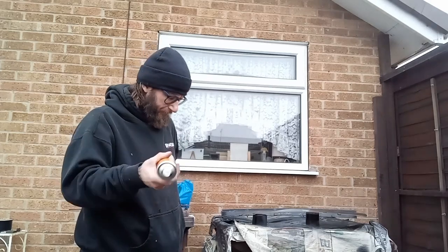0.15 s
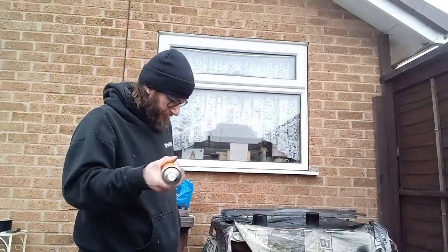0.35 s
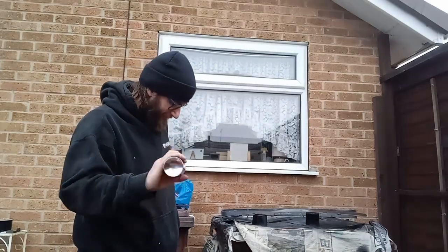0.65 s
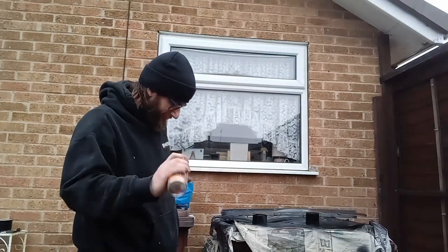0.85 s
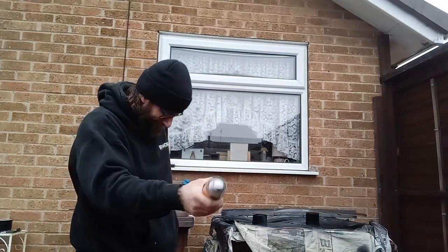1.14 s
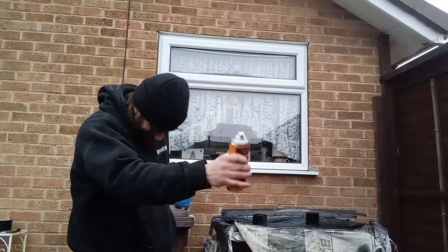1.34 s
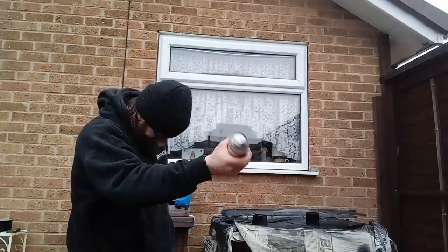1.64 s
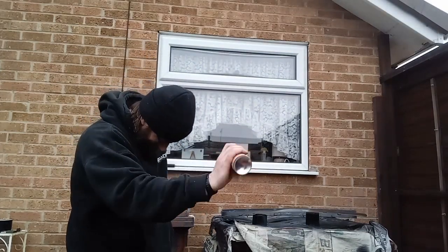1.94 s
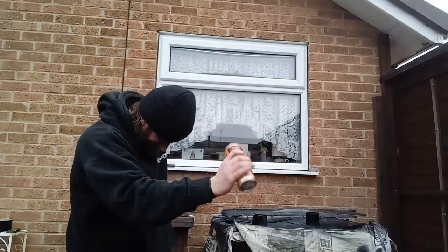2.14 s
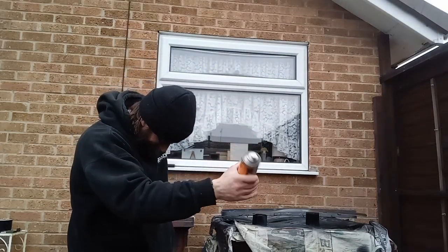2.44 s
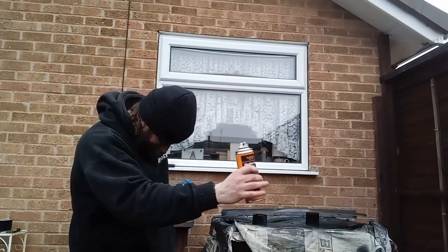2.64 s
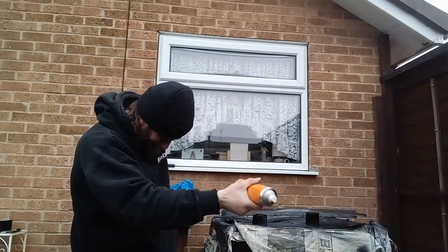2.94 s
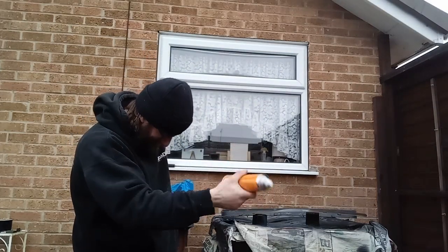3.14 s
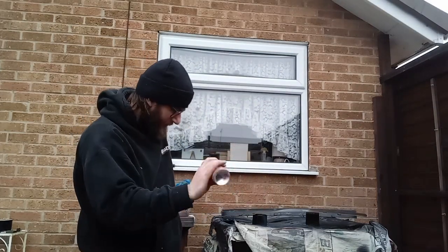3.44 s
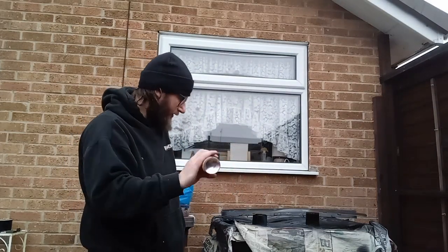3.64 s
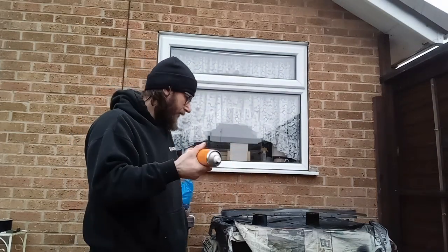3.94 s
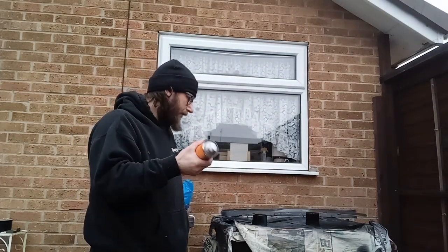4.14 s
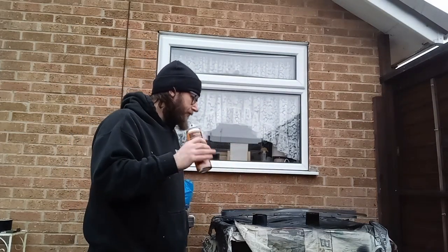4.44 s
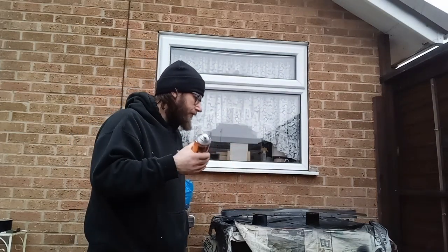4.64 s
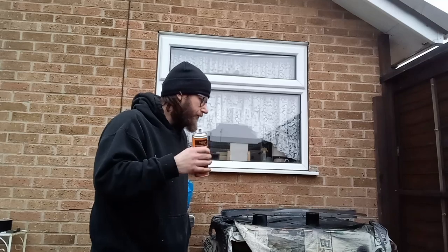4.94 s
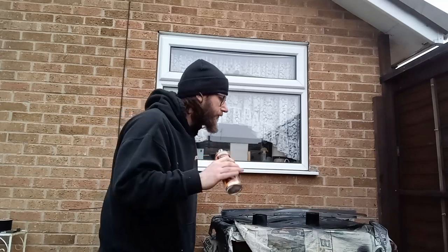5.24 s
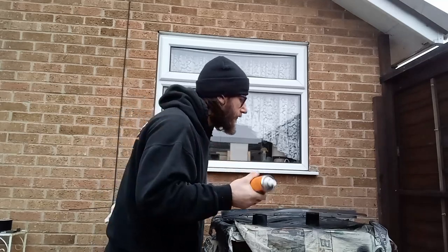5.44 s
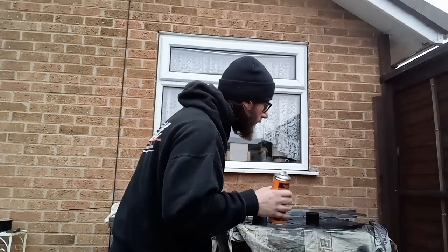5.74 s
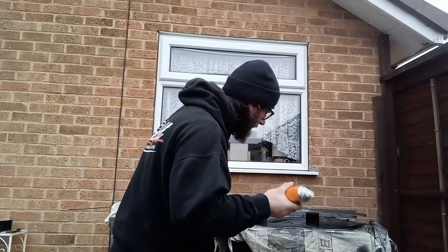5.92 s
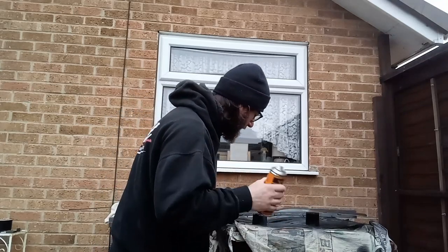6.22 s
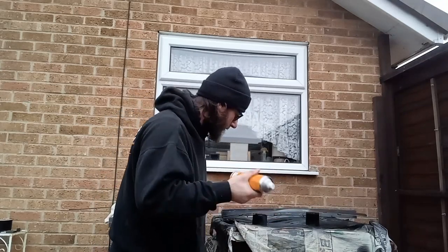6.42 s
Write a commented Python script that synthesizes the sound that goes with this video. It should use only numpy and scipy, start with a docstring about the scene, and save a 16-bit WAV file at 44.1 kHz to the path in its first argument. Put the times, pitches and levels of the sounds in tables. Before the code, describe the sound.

A paint can is shaken close to the microphone in a brick-walled yard. The ball starts with dull, medium knocks, bursts into loud, bright metallic rattling, eases to softer hollow clicks, then turns sharp and tinny again. Paint sloshes faintly; short echoes bounce off the walls. A distant engine wavers low underneath and a car approaches at the end.

```python
"""Shaking a spray paint can

A spray can is shaken by hand in a brick-walled yard. Its mixing ball knocks dully on the side wall, cracks
brightly on the steel ends and skitters in between: short clicks and noise, coloured by the can's resonances.
Paint sloshes as swelling filtered noise, and the yard answers with scattered echoes and a fading tail.
Underneath are a distant engine (wavering sines), low rumble, open-air noise and a car coming nearer.
"""
import sys
import numpy as np
from scipy import signal
from scipy.fft import rfft, irfft
from scipy.io import wavfile
from scipy.ndimage import uniform_filter1d

SR = 44100
rng = np.random.default_rng(int(sys.argv[2]) if len(sys.argv) > 2 else 0)


def wrap_up_sound(samples):
    """Save the sound to the file named by the first command line argument, as 16-bit audio."""
    columns = np.atleast_2d(samples).T
    # keep every value between -1 and 1, then stretch to whole-number steps
    tamed = np.clip(columns, -1, 1)
    steps = np.round(tamed * 32767).astype(np.int16)
    wavfile.write(sys.argv[1], SR, steps)


N = 290045
BLOW_SIZE = 16384  # samples of sound made for one blow

# Blows of the ball: t/s, relative energy level/dB, contact (0 side wall .. 1 steel end),
# squareness (0 glancing .. 1 head-on)
BALL_BLOWS = [(0.002, -2.6, 0.29, 0.25), (0.0373, -3.5, 0.0, 0.28), (0.0966, 4, 0.37, 0.91),
              (0.1416, -3, 0.18, 0.34), (0.1885, 2.9, 0.18, 0.68), (0.2428, -2, 0.065, 0.34),
              (0.2844, 5.5, 0.32, 0.56), (0.3587, -9.5, 0.38, 0.75), (0.394, -2.5, 0.32, 0.53),
              (0.411, 0, 0.26, 0.29), (0.4819, 2.5, 0.29, 0.3), (0.5143, -7, 0.34, 0.64),
              (0.5985, -2, 0.32, 0.57), (0.6072, 7, 0.61, 0.47), (0.6121, 7.8, 0.83, 0.82),
              (0.6342, -1, 0.62, 0.79), (0.6916, -11, 0.0, 1), (0.7496, -10, 0.31, 0.13),
              (0.8035, 8, 0.72, 0.27), (0.8667, 11.5, 0.67, 0.69), (0.9044, 3, 0.68, 0.33),
              (1.0008, 8, 0.72, 0.37), (1.0115, 3, 0.56, 0.33), (1.0604, 0.5, 0.62, 0.55),
              (1.107, 12, 0.73, 0.65), (1.166, 5, 0.72, 0.3), (1.1756, 10, 0.58, 0.46),
              (1.2356, 14, 0.75, 0.66), (1.2618, 7, 0.73, 0.75), (1.3693, -8, 0.32, 0.45),
              (1.3778, 9.5, 0.71, 0.7), (1.4365, 7.5, 0.73, 0.79), (1.4642, 0.3, 0.58, 0.37),
              (1.5352, 7, 0.8, 0.33), (1.5483, 6, 0.54, 0.58), (1.6637, 4, 0.76, 0.54),
              (1.692, 5, 0.4, 0.68), (1.707, 6, 0.68, 0.34), (1.7894, 7.5, 0.71, 0.58),
              (1.875, 9, 0.66, 0.21), (1.9669, 1, 0.61, 0.11), (2.0101, 1.5, 0.56, 0.31),
              (2.075, 9.5, 0.65, 0.24), (2.1411, 1, 0.65, 0.28), (2.1603, 0.5, 0.64, 0.65),
              (2.241, 4.5, 0.7, 0.48), (2.2578, 3, 0.51, 0.081), (2.3505, -4, 0.064, 0.61),
              (2.3838, 8, 0.63, 0.44), (2.4436, 7, 0.92, 0.36), (2.4555, 9.5, 0.65, 0.38),
              (2.6813, -4, 0, 0.46), (2.6917, -4.5, 0.4, 0.28), (2.735, -3.5, 0.38, 0.82),
              (2.7663, -11.5, 0.27, 0.9), (2.875, -4.5, 0.0, 0.56), (2.881, -1.5, 0.37, 0.38),
              (2.905, -2.5, 0.47, 0.98), (2.9581, -0.5, 0.23, 0.15), (3.1371, -11.5, 0.31, 0.18),
              (3.2492, -0.5, 0.27, 0.27), (3.331, -8, 0.32, 0.22), (3.3991, -0.5, 0.31, 0.25),
              (3.4271, 0, 0.044, 0.49), (3.4876, 2.3, 0.24, 0.81), (3.5408, -4, 0.39, 0.1),
              (3.587, -0.3, 0.19, 0.25), (3.665, 1.9, 0.33, 0.23), (3.8052, -7.5, 0.0065, 0.22),
              (3.8368, -9, 0.34, 0.18), (3.8762, -6, 0, 0.52), (3.901, 2, 0.42, 0.43),
              (4.035, -1.7, 0.12, 0.19), (4.0819, -1, 0.29, 0.37), (4.1118, -4, 0.47, 0.28),
              (4.205, -14.5, 0.4, 0.36), (4.2673, -4, 0.0, 0.21), (4.2977, 1, 0.27, 0.67),
              (4.322, -6, 0.59, 0.69), (4.3725, -9.5, 0.6, 0.42), (4.4161, -7.5, 0.44, 0.32),
              (4.4349, -0.7, 0.18, 0.27), (4.5461, 0, 0.39, 0.38), (4.6688, -3.3, 0.3, 0.38),
              (4.6915, -3, 0, 0.38), (4.7416, -0.9, 0.13, 0.39), (4.7682, -3.5, 0.47, 0.2),
              (4.899, -12, 0.2, 0.2), (4.959, -9, 0.38, 0.51), (5.028, -3.5, 0.7, 0.1),
              (5.042, 0.2, 0.79, 0.51), (5.1494, 6, 0.82, 0.37), (5.1997, 3.5, 0.69, 0.46),
              (5.269, -1.5, 1, 0.36), (5.275, 1.5, 0.92, 0.89), (5.339, 4, 0.9, 0.53),
              (5.4016, 0.4, 0.9, 0.51), (5.4601, -5.5, 0.52, 0.1), (5.5349, 3.5, 0.9, 0.85),
              (5.612, -13, 0.29, 0.18), (5.6907, 1, 0.8, 0.26), (5.7207, 1.7, 0.41, 0.31),
              (5.789, 7.5, 0.69, 0.67), (5.8173, 1.5, 0.88, 0.69), (5.846, -1.2, 0.85, 0.31),
              (5.9652, 3, 0.93, 0.43), (5.9801, 2, 0.74, 0.39), (6.0684, 3.6, 0.86, 0.15),
              (6.242, 0.7, 0.75, 0.37), (6.3067, 1, 0.9, 0.31), (6.322, 1.3, 0.78, 0.3),
              (6.4615, 8.5, 0.87, 0.62), (6.487, -2.5, 0.63, 0.74), (6.5574, 7.5, 1, 0.24)]


def undb(db):
    """Turn decibels into a gain."""
    return 10 ** (np.asarray(db) / 20)


def curve(table, column=1):
    """Read one column of a time table at every sample, with straight lines between the rows."""
    rows = np.array(table)
    return np.interp(np.arange(N) / SR, rows[:, 0], rows[:, column])


def spectrum(points, hz):
    """Read the decibels of a (f/Hz, level/dB) table at the given frequencies."""
    f, db = np.transpose(points)
    return np.interp(np.log(hz + 1), np.log(f), db)


def unit(x):
    """Scale each channel to an energy of one."""
    return x / np.sqrt(np.sum(x ** 2, axis=-1, keepdims=True))


def noise(points):
    """Make noise of rms 1, coloured by a spectrum table."""
    gain = undb(spectrum(points, np.fft.rfftfreq(N, 1 / SR)))
    coloured = irfft(rfft(rng.standard_normal(N)) * gain, N)
    return unit(coloured) * np.sqrt(N)


def wide(points, side_db):
    """Coloured stereo noise: a shared part plus a part of opposite sign left and right."""
    middle = noise(points)
    side = noise(points) * np.array([[1], [-1]])
    return middle + undb(side_db) * side


def walk(rate):
    """Smooth random wandering with a spread of one; rate is new random values per second."""
    step = int(SR / rate)
    steps = np.repeat(rng.standard_normal(N // step + 1), step)
    smooth = uniform_filter1d(steps, step)[:N]
    return smooth / smooth.std()


def causal(db):
    """Make a frequency response with this gain whose energy comes as early as it can."""
    cepstrum = irfft(np.log(undb(db)))
    half = len(cepstrum) // 2
    cepstrum[1:half] *= 2
    cepstrum[half + 1:] = 0
    return np.exp(rfft(cepstrum))


def mode(t, hz, t60):
    """Ringing modes: sines that fall by 60 dB in t60 seconds, one row for each frequency."""
    phase = (2 * np.pi * np.reshape(hz, (-1, 1)) * t).astype(np.float32)
    return np.sin(phase) * np.exp(-np.log(1000) * t / t60)


def add(out, s, sound):
    """Mix a sound in at time s, in seconds."""
    start = int(np.clip(s * SR, 0, N - 1))
    out[:, start:start + sound.shape[1]] += sound[:, :N - start]


def slosh(surge_db=3, surge_rate=14, db=-3, rise_s=0.029, fall_s=0.073):
    """Paint and propellant surge inside the can; each swirl rises, holds and settles."""
    # swirls of the paint: start t/s, length/s, level/dB before the overall gain and surging
    swirls = [(0, 1.25, -53.5), (3.4, 1.5, -62), (5.15, 0.055, -49.5)]
    # sound of the hollow can: f/Hz, level/dB
    hollow = [(120, -28), (230, -8), (330, -2.0), (460, 7.0), (650, -5), (2000, -11), (8000, -37)]
    flow = np.zeros(N)
    for s, length, swirl_db in swirls:
        envelope = curve([(s - rise_s, 0), (s, 1), (s + length, 1), (s + length + fall_s, 0)])
        flow += undb(swirl_db) * envelope
    surge = undb(surge_db * walk(surge_rate) + db)
    return wide(hollow, side_db=-17.0) * flow * surge


def street(rumble_db=-30, rumble_follows=.43, air_db=-58, wander=0.0298, waver_db=3.5,
           overtone_db=-14, surge_db=5.5):
    """One wavering engine note, a rumble that swells with it and the soft noise of open air."""
    # distant engine speeding up and easing off: t/s, central firing rate f/Hz, central level/dB
    engine_course = [(0, 68.9, -51), (1.5, 45, -55), (2.2, 55, -44), (2.9, 58.8, -43.5), (3.1, 65.9, -61),
                     (3.68, 71.9, -44), (4.0, 79.14, -50.5), (4.65, 65.1, -41), (4.9, 52.1, -54),
                     (5.25, 46.8, -39), (5.6, 46, -54.5)]
    # colour of the low rumble: f/Hz, relative level/dB
    rumble_colour = [(22, -51), (32, -24), (48, -0.5), (65, 0.5), (95, -14.5), (125, -9), (190, -20),
                     (2000, -81)]
    # colour of the open air: f/Hz, relative level/dB
    air_colour = [(60, 4), (170, -2), (260, 5.5), (600, 1.5), (1200, 3.5), (3000, -27), (8000, -13.5),
                  (16000, -24.5)]

    load_db = curve(engine_course, 2)
    firing_hz = curve(engine_course) * (1 + wander * walk(14))
    phase = 2 * np.pi * np.cumsum(firing_hz) / SR
    note = np.sin(phase) + undb(overtone_db) * np.sin(2 * phase)
    engine = note * undb(load_db + waver_db * walk(8))

    # tanh keeps the random swells within surge_db
    swell_db = rumble_db + rumble_follows * load_db + surge_db * np.tanh(walk(9))
    rumble = wide(rumble_colour, side_db=-18.0) * undb(swell_db)
    air = wide(air_colour, side_db=-4.0) * undb(air_db + walk(3.05))
    return engine + rumble + air


def can_colour(hz, contact, bright, low_hz=420):
    """Response of the can between side wall and steel end; so small a body radiates little bass."""
    # can struck on its side wall: f/Hz, level/dB
    wall_colour = [(400.0, -17), (700.0, -15.5), (1000.0, -5), (1400.0, -0.5), (2000.0, 1.5), (2650.0, -5),
                   (3300.0, -13.0), (4100.0, -7), (5400.0, -17.5), (7200.0, -29.5), (8600.0, -24.5),
                   (10500.0, -15.5), (12500.0, -28), (15000.0, -28)]
    # can struck on a domed end: f/Hz, level/dB
    dome_colour = [(400.0, -32), (700.0, -22), (1000.0, -14), (1400.0, -13.5), (2000.0, -18), (2650.0, -6),
                   (3300.0, -6), (4100.0, -3), (5400.0, 2), (7200.0, 3), (8600.0, -6), (10500.0, -10.5),
                   (12500.0, -10.5), (15000.0, -17)]
    db = (1 - contact) * spectrum(wall_colour, hz) + contact * spectrum(dome_colour, hz)
    # bright is a tilt in dB per octave around 4 kHz
    octaves = np.log2(np.maximum(hz, 500) / 4000)
    bass_loss_db = 10 * np.log10(1 + (low_hz / (hz + 1)) ** 4)
    return causal(db + bright * octaves - bass_loss_db)


def spot(hz, ripple_db=2, spacing_hz=450):
    """Each spot on the can favours its own resonances: a random ripple over the spectrum."""
    knots_hz = np.arange(200) * spacing_hz
    ripple = np.interp(hz, knots_hz, rng.standard_normal(len(knots_hz)))
    return causal(ripple_db * ripple)


def blow_shape(db, square, bright_db=0.4, bright_per_db=0.15, square_bright_db=1):
    """A square hit mostly cracks, a glancing one mostly rings; hard, square hits are brighter."""
    square = np.clip(square, .03, .97)
    bright = bright_db + bright_per_db * db + square_bright_db * (square - .5)
    crack_gain = undb(db) * np.sqrt(square)
    ring_gain = undb(db) * np.sqrt(1 - square)
    return bright, crack_gain, ring_gain


def crack(t, buzz_db=1, apart_db=-6):
    """The contact: a sharp tick and a brief buzz of sheet steel, slightly different left and right."""
    buzz_s = .0008
    chance = rng.standard_normal((3, len(t)))
    buzz = unit((chance[0] + undb(apart_db) * chance[1:]) * np.exp(-t / buzz_s))
    tick = t == 0
    return tick + undb(buzz_db) * buzz


def scatter(t, rise_s=0.0027, fall_s=0.024, slap_db=-13, shared=0.35, lump_db=3):
    """Lumpy early echoes from window, bricks and fence, with two slaps from the wall and the ground."""
    chance = rng.standard_normal((3, len(t)))
    knots_s = np.arange(0, t[-1], .0017)
    lumps = undb(lump_db * np.interp(t, knots_s, rng.standard_normal(len(knots_s))))
    envelope = (1 - np.exp(-t / rise_s)) * np.exp(-t / fall_s)
    spray = unit((shared * chance[0] + chance[1:]) * lumps * envelope)
    # the two slap delays shift a little from blow to blow
    for path_s in np.array([.0072, .0125]) + .001 * rng.standard_normal(2):
        spray[:, int(abs(path_s) * SR)] += undb(slap_db)
    return spray


def shell(t, t60=0.15):
    """The shell rings on; shifting paint detunes its modes, the low ones most, with new weights each blow."""
    # ringing modes of the steel shell before detuning: f/Hz
    shell_modes = [1332, 1680, 2047, 2463, 2790, 3454, 4410, 4870, 5510, 7100, 7430, 8370, 8900]
    hz = np.array(shell_modes)
    detune = .016 * (1 + (2200 / hz) ** 3)
    detuned_hz = hz * (1 + detune * rng.standard_normal(len(hz)))
    weights = rng.standard_normal((2, len(hz)))
    return weights @ mode(t, detuned_hz, t60)


def blows(wall_ring_db=-6, dome_ring_db=-8, echo_db=-1.0, direct_db=0, wall_tilt_db=0.94,
          dome_tilt_db=-1.0, crack_blend=0.14, crack_bright_db=0.22, crack_low_hz=800):
    """Every blow of the ball: the crack, its near echoes and the ring of the shell."""
    # where the hand holds the can: t/s, lag of the left microphone behind the right/ms
    hand_place = [(.6, -0.056), (1.45, 0.062), (2.9, 0.082), (4.9, -0.028), (5.75, 0.13), (6.5, 0.095)]
    out = np.zeros((2, N))
    t, hz = np.arange(BLOW_SIZE) / SR, np.fft.rfftfreq(BLOW_SIZE, 1 / SR)
    for s, db, contact, square in BALL_BLOWS:
        contact = np.clip(contact, 0, 1)
        bright, crack_gain, ring_gain = blow_shape(db, square)
        colour = can_colour(hz, contact, bright) * spot(hz)

        # delay each side by 0.2 ms plus or minus half the lag
        lag_s = np.interp(s, *np.transpose(hand_place)) / 1000
        delay_s = .0002 + np.array([[lag_s], [-lag_s]]) / 2
        ports = np.exp(-2j * np.pi * hz * delay_s)

        # the first crack shakes wall and ends alike, so its contact moves towards halfway
        blend = contact + crack_blend * (.5 - contact)
        crack_colour = can_colour(hz, blend, bright + crack_bright_db, crack_low_hz) * spot(hz)
        direct = unit(irfft(rfft(crack(t)) * crack_colour * ports))

        # tilt echoes and ring a little: brighter for the side wall, duller for the ends
        tilt_db = wall_tilt_db + contact * (dome_tilt_db - wall_tilt_db)
        lasting = colour * undb(tilt_db * np.log2(1 + hz / 1000))
        echoes = unit(irfft(rfft(scatter(t)) * lasting))
        ring_db = wall_ring_db + contact * (dome_ring_db - wall_ring_db)
        ring = undb(ring_db) * unit(irfft(rfft(shell(t)) * lasting))

        after = undb(echo_db) * echoes + ring
        add(out, s, crack_gain * undb(direct_db) * direct + ring_gain * after)
    return out


def yard(x, db, low_t60=0.3, high_t60=0.074, treble_db=-7, rise_s=0.0071):
    """The late, faint reverberation between the houses; its treble dies first."""
    t = np.arange(SR // 2) / SR
    low_pass = signal.butter(2, 3500, fs=SR, output="sos")
    high_pass = signal.butter(2, 3500, "high", fs=SR, output="sos")
    low = signal.sosfilt(low_pass, rng.standard_normal((2, len(t))))
    high = signal.sosfilt(high_pass, rng.standard_normal((2, len(t))))
    low_tail = low * np.exp(-np.log(1000) * t / low_t60)
    high_tail = undb(treble_db) * high * np.exp(-np.log(1000) * t / high_t60)
    tail = unit((low_tail + high_tail) * (1 - np.exp(-t / rise_s)))
    return undb(db) * signal.fftconvolve(x, tail, axes=1)[:, :N]


def skitter(db=-22, spread_db=4.5, flight_s=.016, loss_db=1.53, contact=0.065, bright_db=-0.5,
            force=0.36, echo_db=-8, low_hz=600, count=5):
    """After a blow the ball skitters along the side wall in small dull hops, weakening on average."""
    out = np.zeros((2, N))
    size = BLOW_SIZE // 4
    t, hz = np.arange(size) / SR, np.fft.rfftfreq(size, 1 / SR)
    colour = can_colour(hz, contact, bright_db, low_hz)
    for s, blow_db, *_ in BALL_BLOWS:
        source = crack(t) + undb(echo_db) * scatter(t)
        tap = unit(irfft(rfft(source) * colour * spot(hz)))
        landings = s + flight_s * np.cumsum(rng.uniform(.3, 1.7, count))
        for hop, landing in enumerate(landings):
            # force is the share of the blow's decibels passed on to its hops
            hop_db = db + force * blow_db - loss_db * hop + spread_db * rng.standard_normal()
            add(out, landing, tap * undb(hop_db))
    return out


def singing(t60=0.14, spread=0.0395, count=12):
    """Some blows make the can sing: a tight cluster of beating modes around one pitch."""
    # singing blows: t/s, central pitch f/Hz, energy level/dB
    singing_blows = [(.038, 1639, -8.5), (.243, 1680, -6.5), (2.444, 2790, -1.5), (2.456, 7150, 2.5),
                     (2.456, 7580, 3.5), (4.435, 1850, -10), (4.959, 1700, -15), (5.15, 2210, -9.5)]
    out, t = np.zeros((2, N)), np.arange(BLOW_SIZE) / SR
    for s, hz, db in singing_blows:
        cluster = mode(t, hz * (1 + spread * rng.standard_normal(count)), t60)
        # shared weights plus smaller weights of each side's own
        weights = rng.standard_normal(count) + .5 * rng.standard_normal((2, count))
        add(out, s, undb(db) * unit(weights @ cluster))
    return out


def grazes(db=-23, lead_s=0.0051, share=.35, bright_db=0):
    """Before a blow the ball may brush the wall a few milliseconds early, more often near a steel end."""
    out = np.zeros((2, N))
    size = BLOW_SIZE // 4
    t, hz = np.arange(size) / SR, np.fft.rfftfreq(size, 1 / SR)
    for s, blow_db, contact, _ in BALL_BLOWS:
        brush = unit(irfft(rfft(crack(t)) * can_colour(hz, contact / 2, bright_db)))
        start_s = s - lead_s * rng.uniform(.5, 1.5)
        happens = rng.random() < share * contact
        add(out, start_s, brush * happens * undb(blow_db + db))
    return out


def car(drone_hz=80.3, drone_db=8.5, overtone_db=-17, wander=0.0348, waver_db=5.5):
    """A car comes nearer: its tyre noise and wavering exhaust drone swell together."""
    # approaching car: t/s, shared level/dB before each part's own gain
    approach = [(0, -70), (4.8, -64), (5.5, -57.5), (6.5, -50.5)]
    # colour of tyres on the road: f/Hz, relative level/dB
    road = [(100, -3.5), (200, -11.5), (255, -1), (310, -9.5), (700, -13.5), (4000, -36)]
    tyres = wide(road, side_db=-9.0) * undb(2 * walk(8.8))
    phase = 2 * np.pi * np.cumsum(drone_hz * (1 + wander * walk(14))) / SR
    note = np.sin(phase) + undb(overtone_db) * np.sin(2 * phase)
    drone = note * undb(drone_db + waver_db * walk(14))
    return (tyres + drone) * undb(curve(approach))


def scene():
    """The rattling can, slightly louder on the right, in the yard over the street."""
    can = blows() + grazes() + singing() + skitter() + slosh()
    can = can * undb(np.array([[-.3], [.3]]))
    return can + yard(can, db=-18.0) + street() + car()


def record(dry):
    """The sound clips at full scale, then a steep low-pass filter cuts the treble above 16 kHz."""
    top_hz = 16000
    clipped = np.clip(dry, -1, 1)
    low_pass = signal.ellip(10, .1, 70, top_hz, fs=SR, output="sos")
    return signal.sosfilt(low_pass, clipped)


dry = scene()
out = record(dry)
wrap_up_sound(out)
```